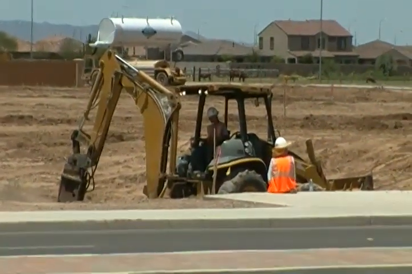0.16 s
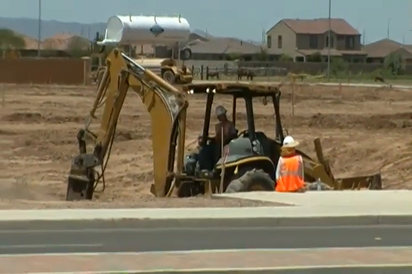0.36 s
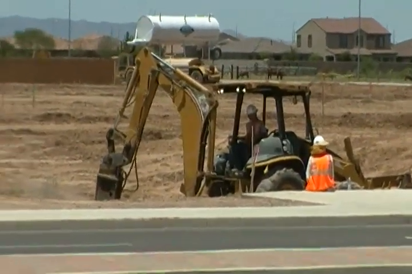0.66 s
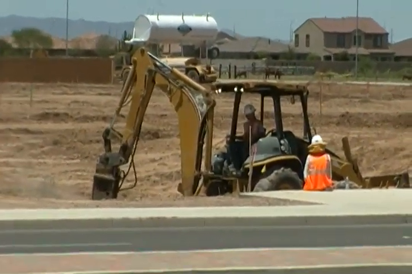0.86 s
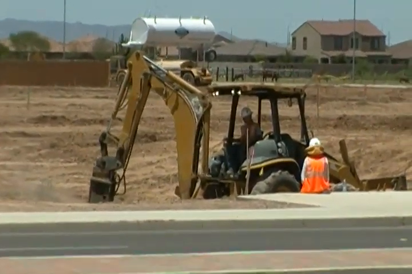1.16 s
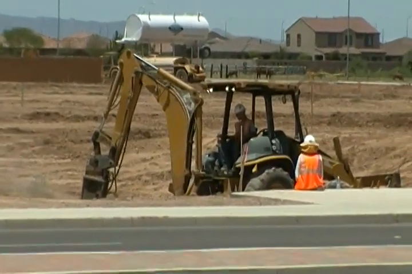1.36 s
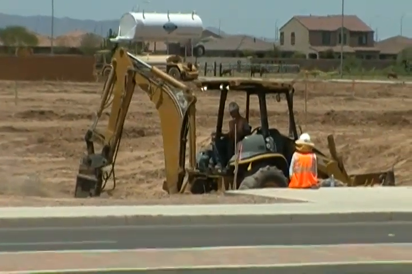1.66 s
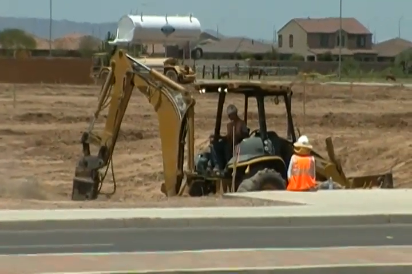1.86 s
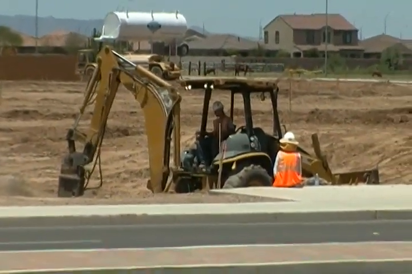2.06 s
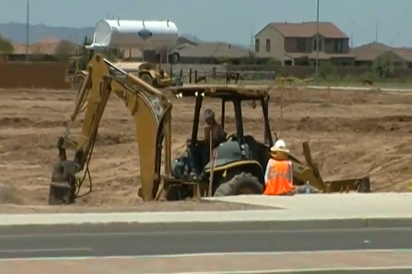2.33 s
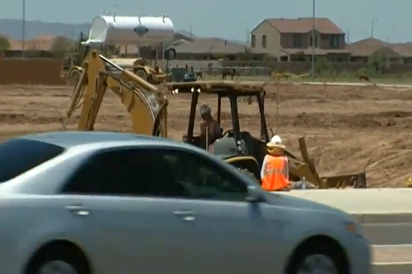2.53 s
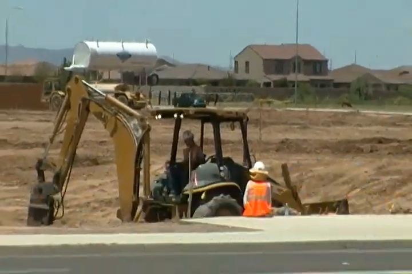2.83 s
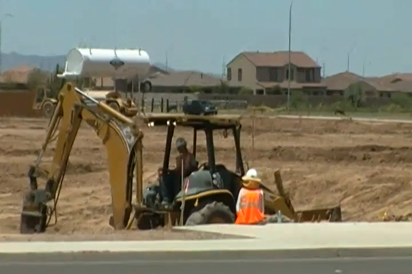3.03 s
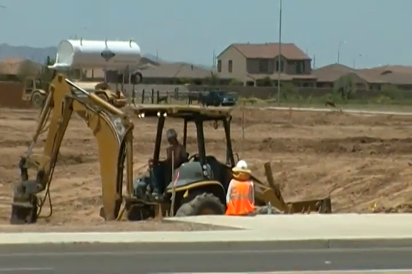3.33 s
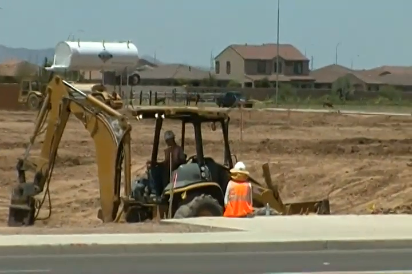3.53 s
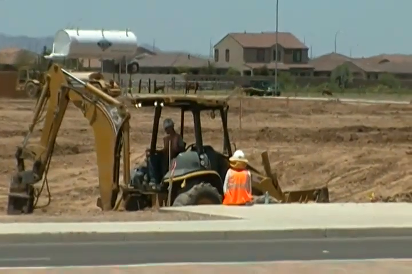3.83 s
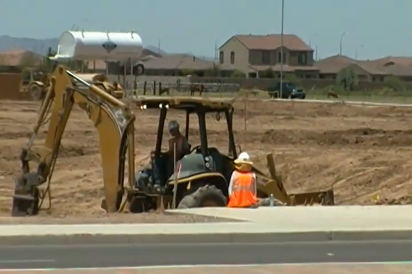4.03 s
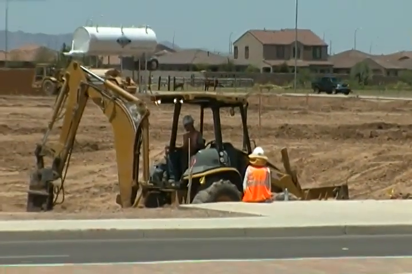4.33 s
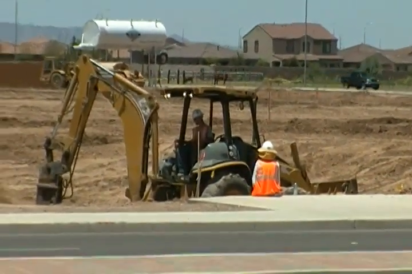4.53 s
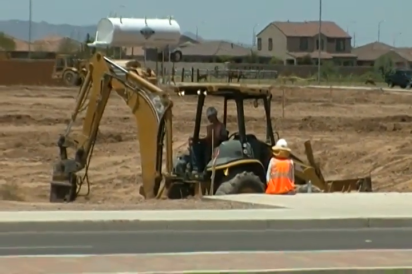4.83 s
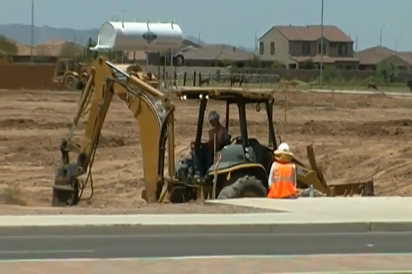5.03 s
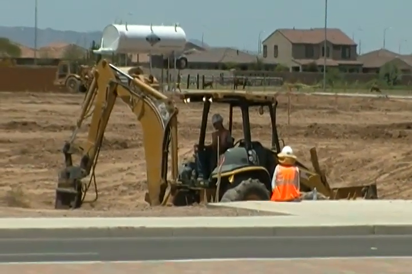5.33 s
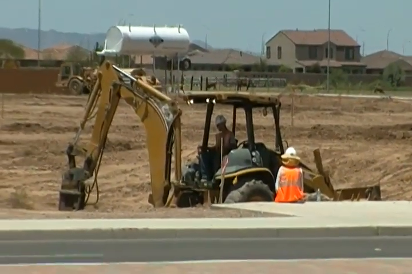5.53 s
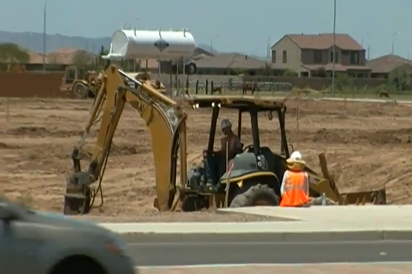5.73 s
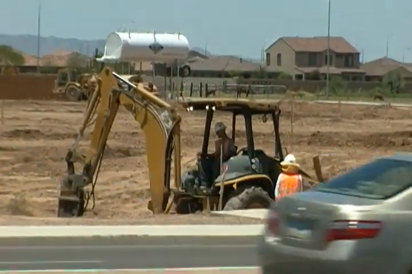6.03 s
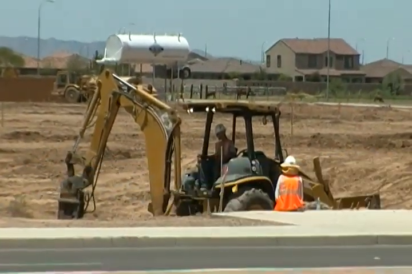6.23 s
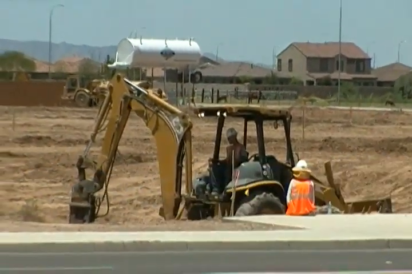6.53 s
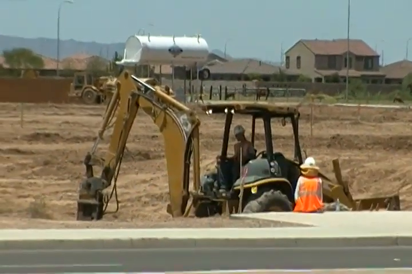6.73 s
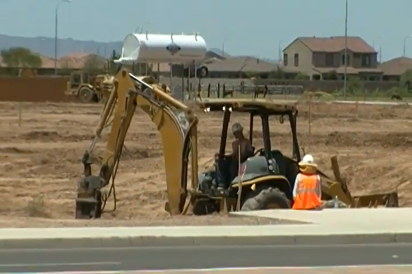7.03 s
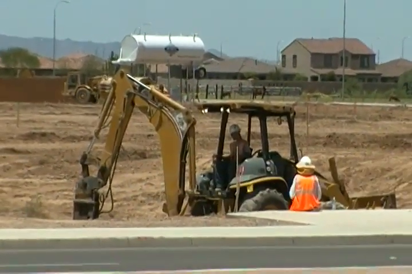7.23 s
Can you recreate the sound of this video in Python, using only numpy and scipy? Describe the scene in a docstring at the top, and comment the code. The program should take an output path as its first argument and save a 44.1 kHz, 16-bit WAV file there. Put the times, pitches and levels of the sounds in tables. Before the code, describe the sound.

Outdoors across a road, a construction machine idles with a low diesel rumble and airy hiss. Its hydraulic hammer gives a few separate dull clacks, scrapes and groans, then locks into fast, bright metallic pounding on concrete that continues to the end. Two cars pass as soft tyre swells nearly buried under the blows. The microphone is some distance away in the open, with only a short scattered echo.

```python
"""Hydraulic hammer across the road

A backhoe's hydraulic hammer breaks concrete: a few loose knocks, then about twelve blows a second.
Each blow is a snap of noise at the tip, decaying tones of chisel and housing, spiky grit and a low thud.
Under it run the diesel (tones on its firing rate), its rumble and hiss (shaped noise) and pump whines.
Two cars roll past as noise that swells with nearness, and a limiter holds down the highest peaks."""
import sys
import numpy as np
from scipy import signal
from scipy.fft import rfft, irfft, next_fast_len
from scipy.io import wavfile
from scipy.ndimage import uniform_filter1d, minimum_filter1d, map_coordinates

SR = 44100
rng = np.random.default_rng(int(sys.argv[2]) if len(sys.argv) > 2 else 0)


def wav_record(signal):
    """Record a signal, one row per channel, as 16-bit PCM in the file named by sys.argv[1]."""
    frames = np.transpose(np.atleast_2d(signal))
    bounded = np.clip(frames, -1, 1)
    # unit amplitude maps onto the largest positive 16-bit level
    quanta = np.round(bounded * 32767).astype(np.int16)
    wavfile.write(sys.argv[1], SR, quanta)


N = 325458  # length in samples


def amp(db):
    """Turn decibels into a plain factor."""
    return 10 ** (np.asarray(db) / 20)


def unit(x):
    """Scale x to rms 1."""
    return x / np.sqrt(np.mean(x ** 2) + 1e-20)


def along(points, hz):
    """Read a curve of (f/Hz, value) points on a log frequency axis."""
    f, v = np.transpose(points)
    return np.interp(np.log(hz + 1), np.log(f + 1), v)


def curves(rows):
    """Give one value per sample for each column after the time."""
    s, *cols = np.transpose(rows)
    return [np.interp(np.arange(N) / SR, s, c) for c in cols]


def wobble(rate):
    """Draw a smooth random curve with rate knots a second."""
    knots = rng.standard_normal(int(N * rate / SR) + 4)
    return map_coordinates(knots, [np.arange(N) * rate / SR])


def filtered(x, response):
    """Multiply the spectrum of x by a response of frequency."""
    n = x.shape[-1]
    m = next_fast_len(n + 4096)
    return irfft(rfft(x, m) * response(np.fft.rfftfreq(m, 1 / SR)), m)[..., :n]


def noise(spectrum, shape):
    """Make coloured noise of rms 1."""
    return unit(filtered(rng.standard_normal(shape), lambda hz: amp(along(spectrum, hz))))


def narrow(hz, width_hz):
    """Make a narrow band of noise of rms 1 whose centre follows the curve hz."""
    slow = wobble(width_hz) + 1j * wobble(width_hz)
    return unit((slow * np.exp(2j * np.pi * np.cumsum(hz) / SR)).real)


def add(track, sound, s):
    """Mix a sound into the track at time s."""
    start = max(round(s * SR), 0)
    part = sound[..., :max(N - start, 0)]
    track[..., start:start + part.shape[-1]] += part


def fade(t, attack, t60):
    """Shape a quick rise and an exponential decay that drops 60 dB in t60 seconds."""
    return (1 - np.exp(-t / attack)) * np.exp(-np.log(1000) * t / t60)


def struck(x):
    """Scale a hit to rms 1 over its first 25 ms."""
    return x / np.sqrt(np.mean(x[..., :SR // 40] ** 2) + 1e-20)


# how alike left and right are in the background noises: f/Hz, coherence/1
ALIKE = [(40, .68), (90, .7), (200, .96), (1000, .98), (3000, .88), (8000, .5)]


def rush(spectrum, patchy_db):
    """Make stereo noise of rms 1, with random louder and softer patches in time and pitch."""
    z = signal.stft(rng.standard_normal((2, N)), nperseg=512)[2]
    field = uniform_filter1d(rng.standard_normal(z.shape[1:]), size=4, axis=0)
    field = uniform_filter1d(field, size=12, axis=1)
    pair = signal.istft(z * amp(patchy_db * unit(field)), nperseg=512)[1][:, :N]

    def mid_side_response(hz):
        # the less alike the two sides, the more goes into their difference
        turn = np.arccos(np.clip(along(ALIKE, hz), -1, 1)) / 2
        return amp(along(spectrum, hz)) * [np.cos(turn), np.sin(turn)]

    mid, side = filtered(pair, mid_side_response)
    return unit(np.array([mid + side, mid - side]))


# engine speed: t/s, firing rate f/Hz before its small wander
DIESEL = [(0, 48), (1.5, 48.5), (2.6, 48), (4, 47), (7.38, 47.5)]
# exhaust tones: multiple of the firing rate/1, middle level/dB
EXHAUST = [(1, -43.5), (2, -37), (3, -45.5), (4, -38.5)]


def diesel():
    """Each firing puffs exhaust, giving tones on multiples of the firing rate; also returns its phase."""
    firing_hz, = curves(DIESEL)
    phase = 2 * np.pi * np.cumsum(firing_hz * (1 + 0.0087 * wobble(5.5))) / SR
    tones = np.zeros(N)
    for multiple, db in EXHAUST:
        wave = np.sin(round(multiple) * phase + 2 * np.pi * rng.random())
        tones += amp(db + 2.1 * wobble(7.7)) * np.sqrt(2) * wave
    return tones, phase


# deep rumble of machine and traffic: t/s, level/dB before a small trim
RUMBLE_LEVEL = [(0, -32.5), (0.82, -32), (2.2, -29), (2.65, -27), (3.1, -30), (4.3, -30), (6.35, -37),
                (6.8, -32), (7.1, -31.5), (7.38, -27)]
# the engine labours as the boom presses down: t/s, low roar level/dB
LOAD = [(0, -28), (0.7, -25.5), (1.45, -26.5), (1.85, -23.5), (2.2, -26), (2.5, -25.5), (3.1, -29),
        (4.3, -28), (5, -28), (5.7, -27.5), (6.3, -30), (7.38, -29.5)]
# the working machine: t/s, roar level/dB, hiss level/dB, both before the trims below
MACHINE = [(0.0, -22, -38.5), (0.68, -18, -37), (0.92, -16, -36), (1.29, -18.5, -31), (1.99, -18, -29.5),
           (3.27, -23.5, -34), (4.3, -17.5, -32.5), (4.75, -20, -32), (5.41, -20.5, -34.5),
           (6.06, -19.5, -31.5), (7.09, -20.5, -31.5), (7.38, -21, -32.5)]
# noise colours (shape only): f/Hz, level/dB per Hz
RUMBLE = [(15, -43.5), (30, -4.5), (43, 6.5), (62, 10), (90, 9), (130, 0), (200, -20.5), (400, -82.5),
          (2000, -120)]
LOW_ROAR = [(70, -23), (105, -2), (130, -1), (200, -1), (260, -6), (320, -7), (400, -9.5), (500, -7.5),
            (620, -11), (1000, -24), (2000, -61), (9000, -120)]
MID_ROAR = [(400, -43.5), (620, -14), (760, -4), (950, -3), (1200, -7.5), (1480, -7.5), (1900, -14),
            (2600, -38.5), (5000, -80.5), (9000, -120)]
HISS = [(1200, -24.5), (2100, 4.5), (2650, 2.5), (3100, -2), (3700, -2.5), (4600, -11), (5800, -14),
        (7200, -16), (8200, -23.5), (9200, -31.5), (11000, -82)]
RUMBLE_DB, FAN_DB, HISS_DB = 0.85, -3.5, -1.77  # trims on the levels above


def site():
    """The machine: exhaust tones, rumble, low roar, a rushing fan and a hiss that throbs with the firing."""
    rumble_db, = curves(RUMBLE_LEVEL)
    load_db, = curves(LOAD)
    roar_db, hiss_db = curves(MACHINE)
    tones, phase = diesel()
    rumble = amp(rumble_db + RUMBLE_DB) * rush(RUMBLE, patchy_db=0.5)
    low = amp(load_db) * rush(LOW_ROAR, patchy_db=1.0)
    fan = amp(roar_db + FAN_DB + 1.0 * wobble(14)) * rush(MID_ROAR, patchy_db=1.0)
    hiss = amp(hiss_db + HISS_DB + .5 * np.sin(phase)) * rush(HISS, patchy_db=1)
    return tones + rumble + low + fan + hiss


# faint whines of the hydraulic pump: from t/s, to t/s, middle f/Hz, middle level/dB
WHINES = [(0, 2, 490, -43), (6.15, 7.15, 555, -37)]
WHINE_FADE_S = 0.15


def pump():
    """The hydraulic pump whines: a slightly unsteady tone that comes and goes."""
    out, t = np.zeros(N), np.arange(N) / SR
    for start, end, hz, db in WHINES:
        gate = np.clip(np.minimum(t - start, end - t) / WHINE_FADE_S + .5, 0, 1)
        phase = 2 * np.pi * np.cumsum(hz * (1 + .001 * wobble(15))) / SR
        out += gate * amp(db + 1.0 * wobble(12)) * np.sqrt(2) * np.sin(phase)
    return out


# cars on the road: t/s when abreast, tyre roar level/dB when abreast
CARS = [(2.6, -32.5), (5.951, -25)]
# colour of coarse asphalt's hum (shape only): f/Hz, level/dB per Hz
COARSE_ROAR = [(600, -23), (850, -13), (1020, 10.5), (1250, -5.5), (1500, -7), (2000, -21), (2700, -4.5),
               (4000, -44), (8000, -69.5)]
CAR_M_PER_S, LANE_M, SOUND_M_PER_S = 22, 11, 343  # car speed, distance when abreast, speed of sound
CAR_BODY_DB, CAR_HISS_DB = -12.5, -5.5  # re the tyre roar, abreast
TREAD_HZ, TREAD_DB = 947, -33  # hum of the tread, as heard abreast
# a coarse stretch of asphalt before the nearest point; its level is before distance weakens it
COARSE_AHEAD_M, COARSE_HALF_LENGTH_M, COARSE_DB = 36, 5.1, -16


def cars():
    """Tyres roar louder when near and hiss close by; the tread's hum sinks in pitch as a car passes."""
    out, t = np.zeros((2, N)), np.arange(N) / SR
    for s, db in CARS:
        place_m = CAR_M_PER_S * (t - s)
        distance_m = np.hypot(place_m, LANE_M)
        near = LANE_M / distance_m
        roar = rush(MID_ROAR, patchy_db=0.0) + amp(CAR_BODY_DB) * rush(LOW_ROAR, patchy_db=4.5)
        # with the factor near below, hiss falls off faster than roar
        hiss = amp(CAR_HISS_DB) * near * rush(HISS, patchy_db=1.5)
        # Doppler shift: higher while coming, lower while leaving
        hz = TREAD_HZ / (1 + CAR_M_PER_S / SOUND_M_PER_S * place_m / distance_m)
        tread = narrow(hz, width_hz=170)
        on_coarse = np.exp(-((place_m + COARSE_AHEAD_M) / COARSE_HALF_LENGTH_M) ** 2)
        coarse = on_coarse * rush(COARSE_ROAR, patchy_db=-3.0)
        out += near * (amp(db) * (roar + hiss) + amp(TREAD_DB) * tread + amp(COARSE_DB) * coarse)
    return out


# the blows, loose at first, then hammering; each part's level is before that part's own trims:
# t/s, ring level/dB, brightness/1 (0 = dull, 1 = bright), crack level/dB, crack f/Hz,
# tail level/dB (change reached late in the blow), thud level/dB
BLOWS = [(0.38, -28, 0.039, -20.5, 2000, -6, -49), (0.693, -25.5, 0, -24, 2170, 0.5, -28),
         (0.868, -32, 0.06, -25, 2600, -1, -43), (1.435, -27, 0.22, -15, 2300, 0.5, -34),
         (1.634, -29, 0.2, -32, 2300, -8, -21), (1.741, -32, 0.54, -25, 2200, 0, -21),
         (1.802, -20.5, 0, -31, 1500, -4, -18), (1.915, -24, 0.59, -11, 1650, -2, -34),
         (1.967, -25, 0.18, -13, 1300, 6.5, -33), (1.992, -24.5, 0.24, -12, 1450, 1, -28),
         (2.088, -22.5, 0, -34, 1500, 1, -20.5), (2.354, -24, 0.45, -16, 1890, 4, -24),
         (2.472, -20, 0.45, -23, 1680, -1.5, -20), (2.573, -21, 0.35, -26, 1737, 3.5, -20),
         (2.659, -22, 0.75, -16, 1720, 1.5, -21), (2.748, -21.5, 0.43, -11, 1570, 1, -18.5),
         (2.838, -21, 0.72, -10, 1810, -8.5, -29), (2.938, -22, 0.77, -11, 1740, -2.5, -24),
         (3.024, -21.5, 0.7, -4, 1661, -4.5, -19.5), (3.116, -19, 0.69, -8.5, 1670, -3.5, -28),
         (3.203, -21, 0.75, -8, 2030, -5, -20.5), (3.287, -21.5, 0.72, -13, 1450, 1.5, -23),
         (3.375, -18.5, 0.92, -8, 1920, -5, -18.5), (3.46, -23, 0.95, -29, 1980, 0.5, -22.5),
         (3.542, -19, 0.89, -11, 2350, -6, -18), (3.627, -22, 0.69, -8, 2340, -3, -22),
         (3.712, -22.5, 0.68, -15, 1750, 0.5, -26), (3.796, -21, 0.46, -12, 1890, -2, -20),
         (3.88, -21, 0.63, -13.5, 2010, -6, -18), (3.956, -22, 0.35, -12.5, 1500, -2.5, -19.5),
         (4.026, -22, 0.28, -10.5, 1450, 1, -22), (4.094, -23, 0.4, -16, 1402, 1, -20),
         (4.163, -24, 0.4, -27, 1440, 3.5, -17), (4.231, -22.5, 0.38, -30, 1500, -2, -25),
         (4.299, -22, 0.2, -26, 1390, -2.5, -27), (4.364, -26, 0.28, -18, 1330, 4.5, -29),
         (4.431, -22.5, 0.32, -25, 1550, 2, -25), (4.499, -22.5, 0.28, -17, 1400, -2, -20.5),
         (4.567, -23, 0.53, -9, 1540, -3, -20), (4.635, -23.5, 0.66, -17, 1580, -3, -21),
         (4.706, -26, 0.82, -10.5, 1591, 2, -21), (4.781, -17.5, 0.74, -4, 1570, -10, -25),
         (4.86, -18.5, 0.44, -18, 1530, -5, -21), (4.945, -21.5, 0.7, -21, 2080, -4.5, -39),
         (5.03, -21, 0.72, -29, 2180, -4, -27), (5.117, -20, 0.9, -12, 2150, -7.5, -19.5),
         (5.204, -22, 0.65, -7, 1760, -3, -25.5), (5.288, -20.5, 0.51, -25, 1740, -1.5, -25),
         (5.371, -23.5, 0.48, -29, 1380, 0, -23), (5.455, -23, 0.72, -13, 1396, -4, -26),
         (5.536, -21.5, 0.63, -18, 1400, -2, -17), (5.616, -22.5, 0.92, -30, 1680, -5, -17.5),
         (5.7, -24, 0.73, -10, 1700, 1, -23), (5.783, -22.5, 0.64, -18, 1682, -2, -19),
         (5.867, -21.5, 0.87, -10, 2040, -4.5, -14), (5.949, -23, 0.55, -13, 1580, -1, -25),
         (6.031, -24, 0.49, -8, 1610, 2, -22), (6.113, -26, 0.53, -11, 1600, 4, -20),
         (6.195, -23.5, 0.48, -28, 1480, -0.5, -21), (6.279, -20.5, 0.39, -17, 1780, -5.5, -23.5),
         (6.362, -21, 0.72, -23, 1603, -4.5, -19), (6.446, -22.5, 0.51, -19, 1590, 1, -15.5),
         (6.53, -23, 0.81, -27, 1630, 0, -19.5), (6.609, -22.5, 0.5, -19, 1540, 3, -18),
         (6.693, -23, 0.92, -17, 1517, -1, -20), (6.777, -24.5, 0.83, -12, 1560, -3, -20),
         (6.861, -25, 0.97, -11, 1696, -2, -18), (6.943, -22.5, 0.84, -14, 1580, 0, -17.5),
         (7.025, -24, 0.99, -25, 1610, -0.5, -17.5), (7.109, -23, 1, -13, 2190, -3, -18.5),
         (7.191, -21, 0.87, -15, 1772, -4, -18), (7.269, -24.5, 0.88, -12, 1830, 1.5, -19.5),
         (7.342, -26, 0.89, -27, 3220, 3, -17)]
# low modes of the machine's frame: f/Hz, level/dB re the blow, t60/s
FRAME = [(45.3, -6.5, 0.5), (58.7, -4.5, 0.44), (88, -9.5, 0.13), (151, -11, 0.04), (209, -8, 0.13)]
# one deep shudder: f/Hz, level/dB
SHUDDER = [(70, -17), (125, -16.5)]
FRAME_LEAD_S, FRAME_SCATTER_DB = 0.02426, 0.7
SHUDDER_S, SHUDDER_HALF_LENGTH_S = 3.533, 0.024


def frame():
    """Each piston stroke rocks the frame, so the bass throbs in step; one heavy shudder stands out."""
    out, t = np.zeros(N), np.arange(SR // 2) / SR
    throb = sum(amp(db) * np.sin(2 * np.pi * hz * t) * fade(t, 0.0013, t60) for hz, db, t60 in FRAME)
    for s, db, *_ in BLOWS:
        add(out, amp(db + FRAME_SCATTER_DB * rng.standard_normal()) * throb, s - FRAME_LEAD_S)
    out = filtered(out, lambda hz: 1 - np.exp(-(hz / 38) ** 6))  # remove the deepest bass
    age = np.arange(N) / SR - SHUDDER_S
    shudder = sum(amp(db) * np.cos(2 * np.pi * hz * age) for hz, db in SHUDDER)
    return out + shudder * np.exp(-(age / SHUDDER_HALF_LENGTH_S) ** 2)


# colour of the dense ring between and above the modes (shape only): f/Hz, level/dB per Hz
CLATTER = [(150, -26.5), (300, -2.5), (450, 2.5), (600, -3.5), (850, 0.5), (1200, 1), (1600, 0),
           (2500, -0.5), (3150, -4.5), (3750, -4), (5100, -13.5), (5900, -25), (6900, -21.5), (8600, -29.5),
           (12500, -65.5)]
LEAD_IN_DB = 6.5  # re the blow's ring level


def lead_ins():
    """A short noise swells over the last milliseconds before each strike."""
    out, t = np.zeros(N), np.arange(SR // 50) / SR
    swell = fade(t[::-1], .0003, .022)  # a decay turned backwards
    for s, db, *_ in BLOWS:
        add(out, amp(db + LEAD_IN_DB) * swell * noise(CLATTER, len(t)), s - t[-1])
    return out


PUSH_DB, BOOM_DB, SHAKE_DB = 11.3, -3, -13  # parts of a thud, re its level
THUD_LEAD_S = .0035


def thuds():
    """The recoil shoves the housing around the strike: a short low push and a dull shake of the boom."""
    out, t = np.zeros(N), np.arange(SR // 6) / SR
    u = (t - THUD_LEAD_S) / 0.00095
    push = u * np.exp(-u ** 2 / 2)  # one swing each way, centred on the strike
    boom = -np.sin(2 * np.pi * 212 * t) * fade(t, 0.0046, 0.048)
    shake_colour = [(60, -23.5), (120, -5.5), (220, 24.0), (400, 15.0), (650, -27.5)]  # f/Hz, level/dB
    for s, *_, db in BLOWS:
        shake = struck(noise(shake_colour, len(t)) * fade(t, 0.00052, 0.038))
        thud = amp(PUSH_DB) * push + amp(BOOM_DB) * boom + amp(SHAKE_DB) * shake
        add(out, amp(db) * thud, s - THUD_LEAD_S)
    return out


# the chisel rattles in its sleeve after the strike: middle delay t/s, middle level/dB
REBOUNDS = [(0, 5.5), (.004, -8), (.0085, 1), (.017, -1), (.026, -14.5)]
REBOUND_SPREAD, REBOUND_SCATTER_DB = .3, 9  # no two rattles are alike


def rattle(t):
    """Loudness shape of a blow's clatter: a cluster of sharp cracks, then the housing's longer shiver."""
    cracks = np.zeros(len(t))
    for delay, db in REBOUNDS:
        level = amp(db + REBOUND_SCATTER_DB * rng.standard_normal())
        age = np.maximum(t - delay * np.exp(REBOUND_SPREAD * rng.standard_normal()), 0)
        cracks += level * fade(age, 0.0029, 0.0073)
    return cracks + amp(5.5) * fade(t, 0.012, 0.084)


def grit(t):
    """Concrete is crushed: spiky grains, whose treble differs from side to side."""
    spikes = amp(6.1 * rng.standard_normal(len(t)))
    grains = rng.standard_normal((3, len(t))) * spikes * fade(t, 0.0031, 0.04)
    centre = filtered(grains[0], lambda f: amp(along(CLATTER, f)))
    spread = filtered(grains[1:], lambda f: amp(along(CLATTER, f)) * f / 4500)
    return struck(centre + spread)


CHIP_LOW_HZ, CHIP_HIGH_HZ, CHIP_WIDTH_HZ, CHIP_T60_S = 1340, 4020, 350, 0.023


def chip(t):
    """A flake of concrete breaks off: a short, rough ring at a random pitch."""
    hz = CHIP_LOW_HZ * (CHIP_HIGH_HZ / CHIP_LOW_HZ) ** rng.random()
    band = filtered(rng.standard_normal(len(t)), lambda f: np.exp(-((f - hz) / CHIP_WIDTH_HZ) ** 2))
    return struck(band * fade(t, 0.00057, CHIP_T60_S))


# the tip lands again: middle delay t/s, level/dB re the first contact
CRACK_BOUNCES = [(.004, -5.5), (.0085, -9)]
CRACK_OCTAVES, CRACK_T60_S = 0.38, 0.0094  # width of the band, length of the snap


def crack(hz):
    """The tip bites into the concrete: a broad, brief snap, repeated more weakly as it bounces."""
    t = np.arange(SR // 30) / SR
    out = np.zeros(len(t))
    first_contact = (0.00011, 0.002)  # t/s, level/dB
    for delay, db in [first_contact] + CRACK_BOUNCES:
        band = filtered(rng.standard_normal(len(t)),
                        lambda f: np.exp(-(np.log2((f + 1) / hz) / CRACK_OCTAVES) ** 2 / 2))
        age = np.maximum(t - delay * np.exp(0.17 * rng.standard_normal()), 0)
        snap = band * fade(age, 0.00051, CRACK_T60_S)
        # same energy as 3 ms at rms 1
        out += amp(db) * snap / np.sqrt(np.sum(snap ** 2) / (.003 * SR))
    return out


# modes of chisel and housing: middle f/Hz, middle level/dB re one another, t60/s
STEEL = [(490, -9, 0.07), (772, -14, 0.097), (863, -1.5, 0.12), (939.4, -2.5, 0.13), (990, -7.5, .08),
         (1037, 3, 0.075), (1083, -5, 0.097), (1274, 6, 0.062), (1290, -4, 0.039), (1455, -10, 0.046),
         (1492, 1.5, 0.043), (1539, 4.5, 0.051), (1744, -1.5, 0.077), (1879, -0.5, 0.069),
         (2153, -4.5, 0.11), (2144, -9, 0.054), (2455, -5, 0.075), (2671, -4.5, 0.12), (2725, -11.5, 0.09),
         (2770, -21.5, 0.13), (3370, -16, 0.025), (3690, -9, 0.051), (3800, -10.5, 0.036),
         (4700, -2, 0.012), (5300, -11.5, 0.044)]
# modes that sing out while the chisel sits in one way:
# from t/s, to t/s, middle f/Hz, level/dB re the blow, t60/s
SEATS = [(2.3, 2.9, 857, 9, 0.087), (2.7, 2.8, 1700, 17, .035), (2.7, 3.1, 1560, 12, 0.034),
         (2.9, 3.25, 2140, 4, 0.038), (3.42, 3.9, 2477, 8.5, 0.055), (3.42, 3.9, 3780, 7.5, 0.033),
         (4.75, 5.35, 760, 3, 0.12), (4.75, 5.33, 1684, 3, .06), (4.9, 5.33, 1856, 8.5, 0.047),
         (4.9, 5.25, 2240, 13, 0.039), (5.6, 7.1, 1550, 5.5, 0.055), (4, 7.38, 1435, -12, 0.36),
         (5.6, 7.38, 1049, 2, 0.15), (3.25, 6.3, 933, -1, .17), (5.65, 6.7, 864, 3, .12)]
# colour of a dull blow and of a bright blow: f/Hz, level/dB
DULL = [(550, 3), (930, 5.5), (1300, 0), (1800, -3), (2600, -3), (4000, -5), (6500, -4.5), (8000, -11),
        (10000, -20)]
BRIGHT = [(550, -2), (930, 4), (1300, 4), (1800, -0.5), (2600, 3), (4000, 5), (6500, 10), (8000, 4.5),
          (10000, 21.5)]
DULL_RISE_S, BRIGHT_RISE_S = 0.0021, 0.00018  # how gradually each kind of blow builds
# parts of a blow, re its ring level, before its colour and tail
RING_DB, CLATTER_DB, GRIT_DB, CHIP_DB = 4, 2, -3.5, -5.5
CRACK_DB = -1.5  # trim on the table's crack level
DETUNE_HZ, MODE_SCATTER_DB = 8.8, 2  # from blow to blow
TAIL_BUILD_S = 0.0095  # a loose chisel rattles on, a wedged one is choked: how soon this shows


def hammer():
    """The piston strikes the chisel: a hard crack, then a ring that changes as the chisel sinks."""
    out, t = np.zeros((2, N)), np.arange(SR // 3) / SR
    hz, mode_db, t60 = np.transpose(STEEL)
    # the rise time of each mode is half its cycle
    decay = fade(t, .5 / hz[:, None], t60[:, None])
    # each depth of the chisel has its own clatter and its own balance of modes
    textures = noise(CLATTER, (28, len(t)))
    balance_db = 2 * rng.standard_normal((len(textures), len(hz)))
    for s, db, bright, crack_db, crack_hz, tail_db, _ in BLOWS:
        # depth grows steadily with time; blend the two nearest textures
        depth = s * SR / N * (len(textures) - 1)
        weights = np.maximum(1 - abs(np.arange(len(textures)) - depth), 0)
        # the load on the chisel detunes every mode a little
        detuned = hz + DETUNE_HZ * rng.standard_normal(len(hz))
        scatter_db = MODE_SCATTER_DB * rng.standard_normal(len(hz))
        strengths = amp(mode_db + weights @ balance_db + scatter_db)
        ring = struck(strengths @ (decay * np.sin(2 * np.pi * detuned[:, None] * t)))
        clatter = struck(weights @ textures * rattle(t))
        blow = amp(RING_DB) * ring + amp(CLATTER_DB) * clatter
        blow = blow + amp(GRIT_DB) * grit(t) + amp(CHIP_DB) * chip(t)
        # blend the two colours; a bright blow is also more sudden
        blow = filtered(blow, lambda f: amp((1 - bright) * along(DULL, f) + bright * along(BRIGHT, f)))
        blow = blow * amp(tail_db * (1 - np.exp(-(t / TAIL_BUILD_S) ** 2)))
        shifts = DETUNE_HZ * rng.standard_normal(len(SEATS))
        for (start, end, seat_hz, seat_db, seat_t60), shift in zip(SEATS, shifts):
            if start <= s <= end:
                tone = np.sin(2 * np.pi * (seat_hz + shift) * t)
                blow = blow + amp(seat_db) * tone * fade(t, 0.00046, seat_t60)
        rise = DULL_RISE_S * (BRIGHT_RISE_S / DULL_RISE_S) ** bright
        add(out, amp(db) * blow * (1 - np.exp(-t / rise)), s - .0004)
        add(out, amp(crack_db + CRACK_DB) * crack(crack_hz), s)
    return out


# valleys between the housing's resonances: f/Hz, width f/Hz, level/dB
VALLEYS = [(555, 43, -8), (1173, 140, -13), (1360, 17, -13.5), (1660, 87, -4.5), (2005, 45, -17),
           (2360, 46, -1), (2580, 65, -5), (2942, 89, -6.5), (3350, 170, -4.5), (4550, 380, -5.5)]


def housing(hz):
    """Response of the steel box: it radiates poorly between its resonances."""
    response = np.ones(len(hz), dtype=complex)
    for centre, width, db in VALLEYS:
        band = 1j * hz * width / (centre * centre - hz * hz + 1j * hz * width)
        response = response * (1 - (1 - amp(db)) * band)
    return response


# scatter from the machine and the ground: f/Hz, t60/s
YARD = [(200, 0.021), (1000, 0.12), (3000, 0.18), (9000, 0.035)]


def yard(x):
    """Machine and ground scatter the sound: a short noisy echo tail, different on each side."""
    hz, t, z = signal.stft(rng.standard_normal((2, SR // 2)), SR, nperseg=256)
    decay = np.exp(-np.log(1000) * t / along(YARD, hz)[:, None])
    tail = signal.istft(z * decay, SR, nperseg=256)[1]
    tail = tail[0] + np.array([[.4], [-.4]]) * tail[1]
    return signal.fftconvolve(x, tail / np.linalg.norm(tail[0]), axes=1)[:, :N]


# middle level re the blow that throws them with its tail, scatter, middle delay
FRAGMENT_DB, FRAGMENT_SCATTER_DB, FRAGMENT_DELAY_S = -10.5, 6.5, 0.02


def fragments():
    """After each blow a loose piece clacks against the chisel, more loudly when the chisel sits loose."""
    out, t = np.zeros(N), np.arange(SR // 20) / SR
    luck = rng.standard_normal((len(BLOWS), 2))
    for (s, db, *_, tail_db, _), (late, size) in zip(BLOWS, luck):
        level_db = db + tail_db + FRAGMENT_DB + FRAGMENT_SCATTER_DB * min(size, 1.5)
        add(out, amp(level_db) * chip(t), s + FRAGMENT_DELAY_S * np.exp(0.39 * late))
    return out


# the chisel drags through rubble: middle t/s, half length t/s, peak level/dB
DRAGS = [(1.303, 0.086, -41), (1.651, 0.044, -22), (1.9, 0.16, -32)]
DRAG_SPIKY_DB = 2.5


def rubble():
    """Loose pieces grind under the chisel in short swells of rough noise."""
    t = np.arange(N) / SR
    grains = rng.standard_normal(N) * amp(DRAG_SPIKY_DB * wobble(900))
    grinding = unit(filtered(grains, lambda f: amp(along(CLATTER, f))))
    return grinding * sum(amp(db) * np.exp(-((t - s) / length) ** 2) for s, length, db in DRAGS)


# the chisel groans in its sleeve: middle t/s, half length t/s, f/Hz, noise knot rate/Hz, level/dB
GROANS = [(1.66, .05, 805, 38, -27.5), (1.795, 0.044, 807, 25, -24), (2.072, 0.17, 780, 20, -24),
          (2.344, 0.24, 860, 28, -26.5), (2.66, 0.059, 887, 47, -42), (2.851, 0.021, 856, 15, -27),
          (2.997, 0.068, 862, 24, -27), (3.5, 0.32, 950, 20.5, -31.5), (5.15, 0.5, 940, 18, -26.5),
          (5.328, 0.16, 969, 30, -26), (5.85, 0.17, 886, 46, -32), (6.5, 0.43, 934, 31, -29)]


def groan():
    """Steel rubs on steel in short, rough groans as the boom leans on the hammer."""
    out, t = np.zeros(N), np.arange(N) / SR
    for s, length, hz, width, db in GROANS:
        swell = np.exp(-((t - s) / length) ** 4)
        out += amp(db) * swell * narrow(np.full(N, hz), width)
    return out


def scene():
    """The hammer and its scatter over the noise of engine and road."""
    boxed = filtered(hammer() + lead_ins() + fragments() + rubble(), housing)
    pounding = boxed + thuds() + groan()
    return pounding + amp(-12.0) * yard(pounding) + frame() + site() + cars() + pump()


TOP_HZ = 12500


def record(dry):
    """The left side is slightly later and louder; a limiter holds the peaks; the top is cut."""
    lag = 2 / SR
    turn = np.array([[-1], [1]])
    sides = filtered(dry, lambda hz: np.exp(1j * np.pi * hz * lag * turn)) * amp([[.6], [-.6]])
    needed = np.minimum(1, .97 / (abs(sides).max(axis=0) + 1e-9))
    # duck for about 3 ms around each peak, with smooth edges
    gain = uniform_filter1d(minimum_filter1d(needed, size=130), size=130)
    return filtered(sides * gain, lambda hz: 1 / (1 + (hz / TOP_HZ) ** 60))


dry = scene()
out = record(dry)
wav_record(out)
```